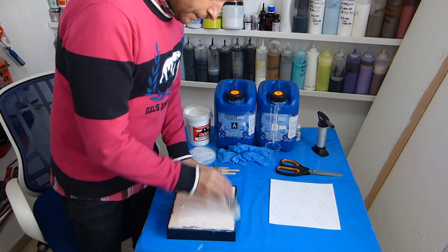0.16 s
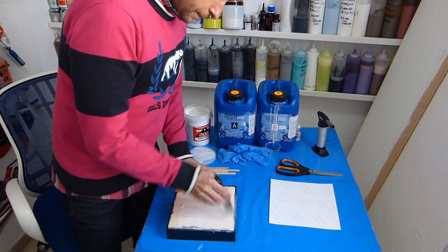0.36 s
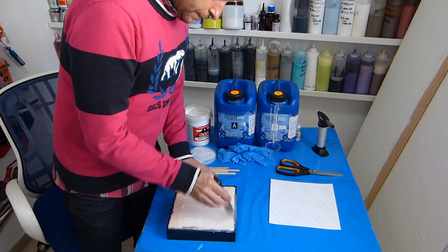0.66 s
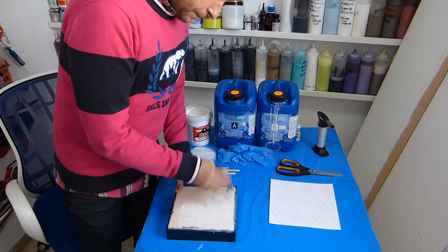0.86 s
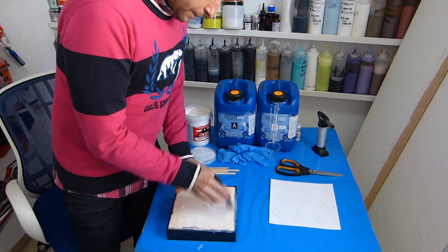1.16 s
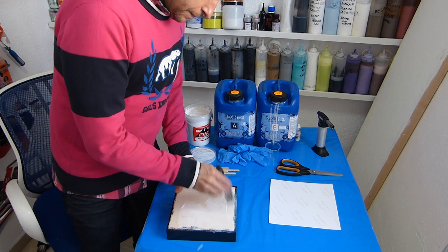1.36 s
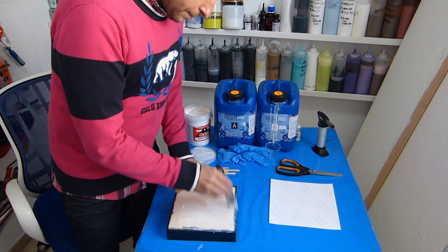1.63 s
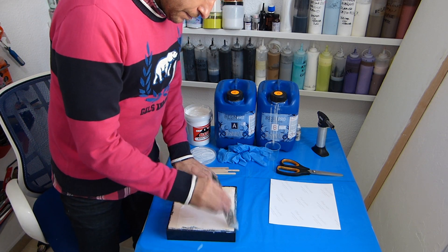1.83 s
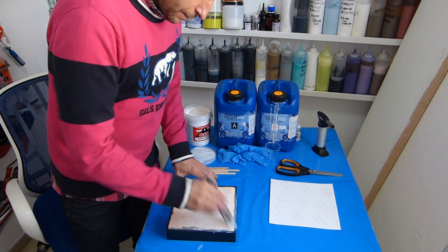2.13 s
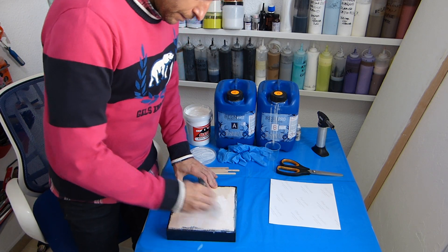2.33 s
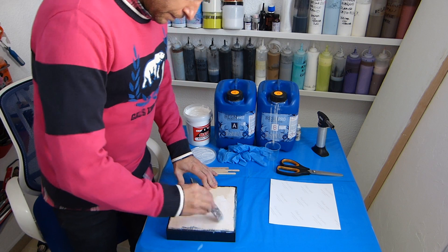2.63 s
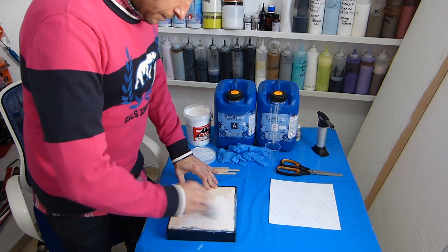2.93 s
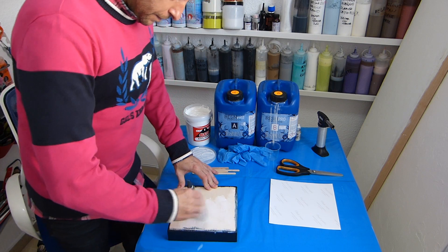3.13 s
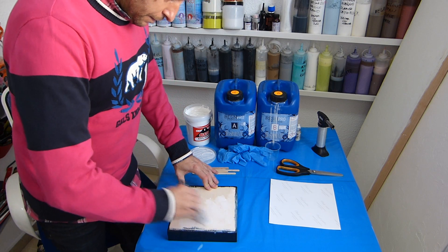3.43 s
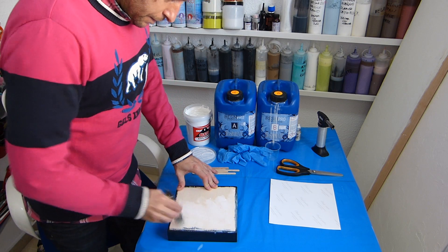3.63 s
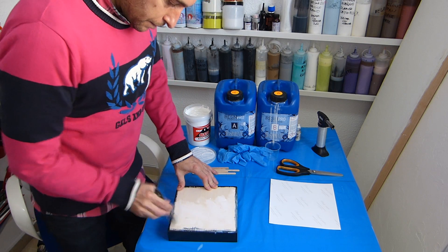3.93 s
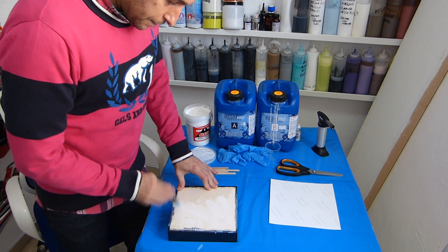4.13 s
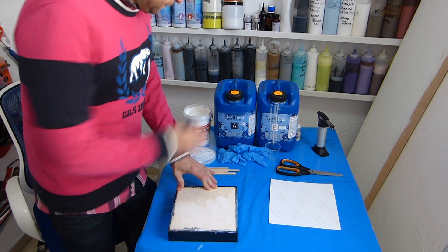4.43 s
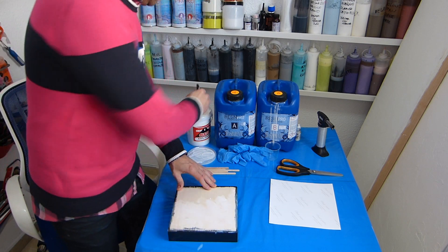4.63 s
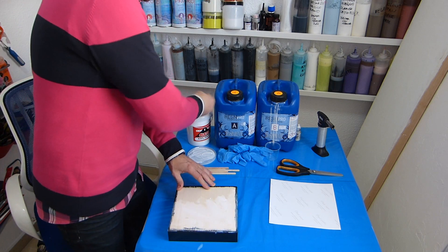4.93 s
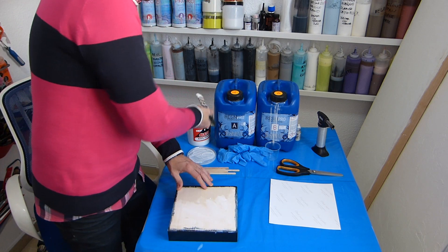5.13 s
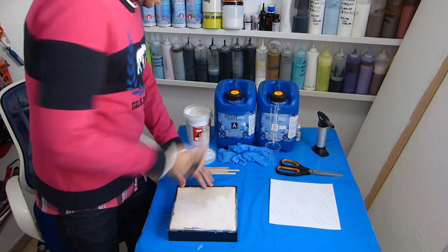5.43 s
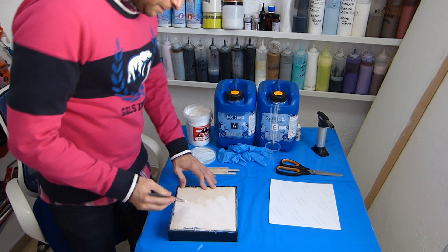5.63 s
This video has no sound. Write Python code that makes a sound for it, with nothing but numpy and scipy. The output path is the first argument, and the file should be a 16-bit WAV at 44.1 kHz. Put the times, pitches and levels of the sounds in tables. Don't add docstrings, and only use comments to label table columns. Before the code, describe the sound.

Close, quiet stereo sound of a flat brush spreading glue on a hollow wooden panel in a small room with a short, dull echo and steady soft hiss. From 0 to 1.2 s, quick airy swishes come every fraction of a second, brightest near 0.27 and 0.55 s, with faint woody handle taps. From 1.2 to 2 s the strokes are weaker, ending in a small dab. Between 2.2 and 2.9 s, dabs cluster with stickier, mid-toned scraping and light knocks. At 3.1 s the panel bumps the table: a rapid, hollow, low woody clatter, quickly damped, leaving a thin ring. Softer rubbing follows until crisp bristle slaps at 3.98 and 4.1 s, with more dabs, ticks and a knock at 4.2-4.3 s. Light sticky touches come around 4.7-4.9 s, then near quiet. At 5.6 s a small clicky tap and brief scrape precede the fading hiss.

```python
import sys
import numpy as np
from scipy import signal
from scipy.fft import rfft, irfft, next_fast_len
from scipy.io import wavfile
from scipy.ndimage import uniform_filter1d

SR = 44100
rng = np.random.default_rng(int(sys.argv[2]) if len(sys.argv) > 2 else 0)


def store_wav(level_fs):
    pcm = np.round(np.clip(np.atleast_2d(level_fs), -1, 1) * 32767)
    wavfile.write(sys.argv[1], SR, pcm.T.astype(np.int16))


def field_ratio(decibels):
    return 10 ** (np.asarray(decibels, dtype=float) / 20)


N = 254348


def rms_one(x):
    return x / np.sqrt(np.mean(x ** 2) + 1e-20)


def at_hz(points, hz):
    table = np.array(points)
    return np.interp(np.log(hz), np.log(table[:, 0]), table[:, 1])


def high_pass(x, hz):
    return signal.sosfilt(signal.butter(4, hz, "high", fs=SR, output="sos"), x)


def drift(rate, spread_db=None):
    r = np.exp(-80 * np.pi * rate / SR)
    slow = signal.lfilter([1], [1, -2 * r, r * r], rng.standard_normal(N // 40 + 2002))[2000:]
    slow = rms_one(slow - slow.mean())
    if spread_db is not None:
        slow = field_ratio(spread_db * np.minimum(slow, 2))
    return np.interp(np.arange(N) / 40, np.arange(len(slow)), slow)


def ring(x, hz, t60):
    r = field_ratio(-60 / (max(t60, 0.005) * SR))
    w = 2 * np.pi * hz / SR
    return signal.lfilter([0, np.sin(w)], [1, -2 * r * np.cos(w), r * r], x + 1e-18)


def resonate(x, peaks):
    out = 0
    for k, (hz, width_hz, db) in enumerate(peaks):
        r = np.exp(-np.pi * width_hz / SR)
        gain = (-1) ** k * field_ratio(db) * (1 - r * r) / 2
        out = out + signal.lfilter([gain, 0, -gain], [1, -2 * r * np.cos(2 * np.pi * hz / SR), r * r], x)
    return out


def slips(per_s, spread_db, size):
    shape = size + (N,)
    when = rng.random(shape) < per_s / SR
    strength = field_ratio(spread_db * np.minimum(rng.exponential(1, shape), 3.3))
    return rms_one(when * strength * rng.choice([-1, 1], shape))


# (frequency [Hz], likeness [-1 to 1])
STEREO_LIKENESS = [(60, 1), (150, 0.17), (380, -0.82), (950, -0.57), (2380, 0.21), (5960, 0.75),
                   (15000, -0.21)]
# (frequency [Hz], left over right [dB])
STEREO_LEAN = [(60, -0.5), (240, 0.5), (950, 0), (3760, 1.5), (15000, 1)]


def coloured(white, spectrum, patchy_db):
    out = 0
    edges = spectrum[0][0] * 2 ** np.arange(0, 9, 1 / 3)
    edges = edges[edges < 16500]
    for k, (low, high) in enumerate(zip(edges, edges[1:])):
        band = signal.butter(2, [low, high], "band", fs=SR, output="sos")
        mid, side = signal.sosfilt(band, white[k % 2])
        hz = np.sqrt(low * high)
        alike = np.clip(at_hz(STEREO_LIKENESS, hz), -1, 1)
        lean_db = at_hz(STEREO_LEAN, hz) / 2
        pair = np.sqrt(1 + alike) * mid + np.sqrt(1 - alike) * side * [[1], [-1]]
        level = field_ratio(at_hz(spectrum, hz) + np.array([[lean_db], [-lean_db]]))
        out = out + drift(6.0, patchy_db) * pair * level
    return rms_one(out)


# (time [s], light contact [dB], stickiness [dB], nearness to the rim [dB/octave])
RESTING_BRUSH = [(0, -58, -5, -3), (.19, -62.5, 1.5, 8), (.5, -61, -8.5, 2), (.79, -61, -3.5, 5),
                 (1.04, -66.5, -15, 5), (1.39, -68, -15, -5), (1.77, -65, -7, -7), (2.2, -66.5, -3.5, -7),
                 (2.42, -60.5, -4.5, 0), (2.71, -65, -1.5, -5.5), (3.02, -61, -6.5, 4),
                 (3.36, -65.5, -4.5, -2.5), (3.94, -61.5, -6.5, -7.5), (4.18, -63.5, -8, -8),
                 (4.4, -55.5, -6.5, 12), (4.95, -57, -8.5, 9), (5.16, -65.5, -9, 6), (5.77, -60, 0, 13)]
# (time [s], peak [dB], scrape relative to it [dB], fade t60 [s])
BRISTLE_DABS = [(0.107, -39.5, -13, 0.23), (0.3893, -47, 1, 0.15), (0.4544, -44, -4.5, 0.2),
                (0.8001, -46, 0, 0.13), (1.075, -46, -3.5, 0.15), (1.81, -45.5, 1, 0.097),
                (1.9758, -38.5, -20, 0.31), (2.2436, -37, -14, 0.11), (2.278, -37.5, -12, 0.43),
                (2.3496, -41.5, -4.5, 0.25), (2.398, -45, 6.5, 0.075), (2.5047, -44, -1, 0.16),
                (2.5592, -36, -23, 0.19), (2.7994, -43, -7, 0.203), (2.8692, -42, -7.5, 0.25),
                (3.0687, -38.5, -1, 0.071), (3.103, -31.5, -5, 0.083), (3.2755, -49, 4.5, 0.11),
                (3.378, -35.5, -29, 0.15), (3.497, -45, -7.5, 0.47), (3.5675, -43.5, -22, 0.16),
                (3.9865, -28, -18, 0.11), (4.0942, -29, -24, 0.11), (4.196, -32.5, -15, 0.31),
                (4.236, -33, -9.5, 0.45), (4.274, -35, -2, 0.25), (4.674, -36, -5.5, 0.121),
                (4.7194, -37.5, -12, 0.135), (4.9097, -47, 3, 0.12), (5.603, -43, -4, 0.13)]
# (fastest at [s], hiss [dB], swell [s], tip sheen relative [dB], glue scrape relative [dB])
STROKES = [(.003, -49.5, 0.024, -7.5, -7), (.08, -54, 0.054, -8, -9), (0.265, -44, 0.074, -4, -18),
           (.4, -53.5, 0.05, -11, -3), (0.541, -47, 0.026, -3.5, -28), (.82, -56.5, 0.061, -25, -6),
           (1.101, -52, 0.051, -5.5, -7), (1.32, -60.5, 0.041, -5.5, -12), (1.6, -62, 0.032, -18, -1),
           (1.81, -57, 0.025, -10, -2.5), (1.981, -54.5, 0.021, -29, 0.5), (2.27, -51.5, 0.053, -23, 0),
           (2.53, -52, 0.085, -18, -0.5), (2.62, -55, 0.044, -9, -6), (2.83, -55.5, 0.2, -7, -2.5),
           (3.131, -44.5, 0.035, -9, -12), (3.389, -52, 0.028, -7, -13), (3.72, -57.5, 0.15, -9.5, -8),
           (3.985, -42, 0.032, -14, -2.5), (4.095, -50, 0.071, -37, -7), (4.205, -46, 0.02, -28, -2),
           (4.7, -51, 0.1, -24, -1.5), (5.51, -58, 0.026, -8, 2.5), (5.62, -64, 0.031, -25, -13)]
# (fastest at [s], hiss [dB], swell [s], glue scrape relative [dB])
LIGHT_STROKES = [(.66, -62.5, .05, -1), (.96, -63.5, 0.055, -1.5), (1.19, -62, .03, -9),
                 (1.43, -63, .03, -7), (1.52, -64, 0.037, -7), (1.92, -68, .04, -9),
                 (3.05, -53.5, 0.026, 0), (3.64, -77, .05, -8), (3.78, -55.5, 0.02, -6),
                 (4.47, -61, 0.037, -1), (4.8, -57.5, 0.08, 5), (5.04, -61.5, 0.071, -13),
                 (5.34, -63.5, 0.092, 3), (5.56, -62.5, 0.028, 4.5)]
# (time [s], level [dB], hold [s], t60 [s], nearness to the rim [dB/octave])
PANEL_SHAKES = [(0, -52, 0.037, 0.15, 1), (0.21, -56.5, 0.04, .2, 16), (1.28, -67, 0.043, 0.18, 11),
                (2.858, -58, 0.043, 0.23, -1), (3.041, -54, 0.049, .1, 0), (3.1, -40.5, 0.049, 0.17, -3.5),
                (3.202, -55, 0.044, 0.17, -7), (3.925, -62, 0.046, 0.22, -6), (4.244, -51.5, 0.05, .15, 3),
                (4.645, -59.5, 0.036, .2, -11), (5.595, -57.5, 0.023, 0.44, 11)]


def pressure():
    t = np.arange(N) / SR
    s, *columns = np.transpose(RESTING_BRUSH)
    rest_db, sticky_db, rim_db = [np.interp(t, s, c) for c in columns]

    lift_s, lift_db, bump_lift_db = 0.061, -2, -5
    bump_s = PANEL_BUMP[0][0]
    ease = np.exp(-np.abs(t - bump_s) / lift_s) * (t < bump_s) * bump_lift_db
    dabs, dab_scrape = np.zeros(N), np.zeros(N)
    for start, db, rel_db, t60 in BRISTLE_DABS:
        i = round(start * SR)
        age = t[:min(N - i, SR // 3)]
        dab = (1 - np.exp(-age / 0.0027)) * field_ratio(2 * (db - 12.0 - 60 * age / max(t60, 0.02)))
        dabs[i:i + len(age)] += dab
        dab_scrape[i:i + len(age)] += dab * field_ratio(2 * rel_db)
        lead = t[:min(i, SR // 10)][::-1]
        ease[i - len(lead):i] += lift_db * np.exp(-lead / lift_s)

    rest, sweeps = field_ratio(2 * rest_db), np.zeros(N)
    sheen = rest * field_ratio(2 * (-9 - 0.28 * rim_db))
    scrape = rest * field_ratio(2 * sticky_db)
    light = [(s, db, swell, -9, rel_db) for s, db, swell, rel_db in LIGHT_STROKES]
    for peak, db, swell, sheen_db, scrape_db in STROKES + light:
        near = slice(max(round(peak * SR) - SR // 3, 0), round(peak * SR) + SR // 2)
        fade = 0.04 + 0.75 * swell
        away = np.where(t[near] < peak, (peak - t[near]) / swell, (t[near] - peak) / fade)
        sweep = field_ratio(2 * (db - 15 * np.minimum(away, 5) ** 1.3))
        sweeps[near] += sweep
        sheen[near] += sweep * field_ratio(2 * sheen_db)
        scrape[near] += sweep * field_ratio(2 * scrape_db)

    eased = field_ratio(2 * ease)
    hum = eased * (rest * field_ratio(2 * (0.5 + sticky_db)) + sweeps * field_ratio(2 * -14.5))
    tilt = hum * (rim_db + 4 * sweeps / (rest + sweeps))
    for start, db, hold, t60, shake_rim_db in PANEL_SHAKES:
        near = slice(round(start * SR), round(start * SR) + SR // 2)
        age = t[near] - start
        shake = np.clip(age / 0.011, 0, 1) * field_ratio(2 * (db - 60 * np.maximum(age - hold, 0) / t60))
        hum[near] += shake
        tilt[near] += shake * shake_rim_db

    hiss = eased * (rest + sweeps) + dabs
    sheen = (eased * sheen + dabs * field_ratio(2 * -29)) / hiss
    scrape = eased * scrape * field_ratio(-9.0) + dab_scrape
    return np.sqrt(hiss), np.sqrt(sheen), np.sqrt(scrape), field_ratio(-5.0) * np.sqrt(hum), tilt / hum


# (frequency [Hz], density [dB per Hz])
BRISTLE_TONE = [(1650, -11.5), (2800, -5), (3090, -2.5), (3960, -0.5), (4370, 0), (6330, 0), (7700, 0),
                (9000, -9), (11700, -32), (19800, -120)]


def tufts(count):
    out = 0
    rub = slips(14000, 2.6, size=())
    for hz in np.geomspace(3200, 11000, count) * rng.uniform(0.9, 1.03, count):
        streak = resonate(rub, [(hz, 70, 0)])
        out = out + field_ratio(at_hz(BRISTLE_TONE, hz)) * drift(7.0, spread_db=5.5) * streak
    return rms_one(out)


# (frequency [Hz], density [dB per Hz])
TIP_SHEEN = [(7500, -7), (9000, 8), (11000, -7), (13000, -7), (14500, -26), (15500, -40)]


def bristles(hiss, sheen):
    ticks = slips(14000, 3.3, size=(2, 2))
    body = coloured(ticks, BRISTLE_TONE, patchy_db=2.0)
    body = rms_one(body + field_ratio(-6.5) * tufts(count=22))
    body = body - np.clip(0.84 * sheen, 0, 0.9) * resonate(body, [(3060, 1900, 0)])
    bright = body + sheen * coloured(ticks, TIP_SHEEN, patchy_db=2.0)
    soft_top = signal.butter(4, 14000, fs=SR, output="sos")
    return hiss * field_ratio(0.15 * drift(40)) * signal.sosfilt(soft_top, bright)


# (frequency [Hz], width [Hz], level [dB])
GLUE_SCRAPE = [(1220, 1010, -0.5), (1880, 280, 7.5), (2310, 830, 0.5)]


def glue(scrape):
    sticky = rms_one(resonate(slips(5000, 3.4, size=()), GLUE_SCRAPE))
    return scrape * field_ratio(0.78 * drift(44.0)) * sticky


# (frequency [Hz], level [dB], t60 [s])
PANEL_MODES = [(138, -16.5, 0.34), (196, -3.5, 0.14), (302, -13, 0.061), (323, -13.5, 0.07),
               (380, -12, 0.063), (455, -12, 0.055), (500, -6.5, 0.065), (610, -14, 0.052),
               (755, -14, 0.014), (822, -5, 0.049), (965, -11, 0.06), (1140, -1, 0.027), (1328, -8.5, 0.27),
               (1400, -18, 0.21), (1560, -11, 0.098), (1933, -13.5, 0.071)]
# (time [s], blow [dB])
PANEL_BUMP = [
    (3.103, -53),
    (3.107, -44.5),
    (3.115, -37),
    (3.118, -37),
    (3.123, -37),
    (3.129, -41),
    (3.1386, -37),
    (3.157, -44),
    (3.184, -46),
]


def panel(hum, tilt_db):
    rub = slips(2500, 2.8, size=())
    at = [round(s * SR) for s, db in PANEL_BUMP]
    blow_db = np.array(PANEL_BUMP)[:, 1]
    humming, struck, power = 0, 0, 0
    for hz, db, t60 in PANEL_MODES:
        share = field_ratio(db + (1.0 + tilt_db) * np.log2(hz / 600))
        rubbed = rms_one(ring(rub, hz, 0.28 * t60))
        humming = humming + share * drift(8, spread_db=2) * rubbed
        power = power + share ** 2
        blows = np.zeros(N)
        blows[at] = field_ratio(blow_db + db + rng.normal(0, 2.9, len(at)))
        struck = struck + ring(blows, hz, t60)
    damping = field_ratio(-6 * np.clip((np.arange(N) / SR - 3.152) / 0.013, 0, 1))
    return field_ratio(-2.0) * hum * humming / np.sqrt(power) + struck * damping


# (frequency [Hz], density [dB per Hz])
ROOM_TONE = [(35, -9), (60, -8), (265, -1.5), (376, 2), (641, 1.5), (771, -1), (1090, -2.5), (1230, -3.5),
             (1350, -3), (1950, -9.5), (3410, -16), (4720, -7.5), (15400, -27)]


def room_hiss():
    return field_ratio(-60 - 2.0) * coloured(rng.standard_normal((2, 2, N)), ROOM_TONE, patchy_db=3.0)


def room(x):
    t60_s, wall_cut_hz = 0.23, 5400
    size = next_fast_len(N + SR)
    w = 2 * np.pi * np.arange(size // 2 + 1) / size
    wall = 1 / (1 + 1j * w * SR / (2 * np.pi * wall_cut_hz))
    out = [0, 0]
    for k, lag in enumerate((rng.uniform(0.009, 0.03, 16) * SR).astype(int)):
        loop = field_ratio(-60 * lag / SR / t60_s) * wall * np.exp(-1j * w * lag)
        out[k % 2] = out[k % 2] + (-1) ** (k // 2) * loop / (1 - loop)
    return irfft(rfft(x, size) * np.array(out), size)[:, :N]


# (time [s], peak [dB], ring [Hz], crack relative [dB])
HANDLE_KNOCKS = [(0.03, -50, 790, -19), (0.089, -55, 1005, -15), (0.118, -51.5, 318, -10),
                 (0.149, -55, 310, -18.5), (0.236, -45, 822, -17), (0.269, -53, 815, -21),
                 (0.289, -54, 844, -14), (0.329, -61, 850, -10), (1.163, -59, 990, -17),
                 (2.275, -54, 397, -3), (2.349, -54, 404, -8), (2.434, -57, 976, -12),
                 (2.519, -54.5, 1044, -15), (2.569, -62, 427, -8), (2.799, -59, 332, -7),
                 (2.876, -45.5, 421, -12.5), (2.908, -66, 450, -14), (3.067, -50.5, 191, -8),
                 (3.765, -47, 409, -23), (4.246, -39.5, 389, -18), (4.284, -53, 403, -7),
                 (4.298, -53, 836, -14), (4.314, -58, 844, -9), (4.452, -55, 1400, -18),
                 (5.499, -56, 1200, -9), (5.604, -53.5, 750, -0.5), (5.609, -51, 1057, -1.5),
                 (5.653, -52.5, 1060, -11), (5.682, -54, 700, -12), (5.692, -53.5, 867, -18)]


def knocks():
    out, age = np.zeros(N + SR), np.arange(SR // 4) / SR
    detune = rng.uniform(1.031, 1.26, (len(HANDLE_KNOCKS), 2))
    cracks = rng.standard_normal((len(HANDLE_KNOCKS), len(age)))
    cracks = signal.sosfilt(signal.butter(2, [600, 4000], "band", fs=SR, output="sos"), cracks)
    for (start, db, hz, crack_db), (up, down), crack in zip(HANDLE_KNOCKS, detune, cracks):
        phase = 2 * np.pi * hz * age
        modes = np.sin(phase) + 0.26 * np.sin(phase * up) + 0.51 * np.sin(phase / down)
        body = (1 - np.exp(-age * hz / 1.7)) * modes
        body = body + field_ratio(crack_db + 10.5) * crack * np.exp(-age / 0.0097)
        body = field_ratio(db - 7.0 - 60 * age / 0.056 * (hz / 500) ** 0.22) * body
        for delay, echo_db in [(0, 10), (0.018, -2), (0.037, -15)]:
            i = round((start + delay) * SR)
            out[i:i + len(age)] += field_ratio(echo_db) * body
    return out[:N]


# (time [s], held [s], frequency [Hz], width [Hz], level [dB])
RUBBED_SPOTS = [(.03, 0.035, 1380, 120, -69), (.07, .02, 800, 90, -71), (.095, 0.043, 1020, 119, -65),
                (.11, 0.027, 690, 100, -63.5), (0.241, 0.033, 1700, 120, -62), (.25, 0.084, 835, 160, -67),
                (.26, 0.026, 2070, 150, -66), (.29, 0.044, 1290, 100, -70), (.39, 0.045, 1090, 150, -76),
                (2.26, 0.039, 430, 70, -63), (2.32, .04, 1380, 150, -68), (2.34, 0.069, 417, 60.4, -68),
                (2.35, 0.041, 570, 79, -65.5), (2.43, .02, 1010, 120, -65.5), (2.5, 0.082, 420, 50.3, -66),
                (2.505, 0.033, 5960, 700, -56.5), (2.511, 0.048, 1660, 100, -67),
                (2.516, 0.03, 1050, 120, -65), (2.56, .02, 7000, 700, -61), (2.61, 0.036, 1290, 100, -70),
                (2.615, .03, 4900, 300, -62), (2.621, 0.034, 2560, 200, -64.5),
                (2.775, .05, 3230, 100, -72), (2.781, 0.029, 400, 150, -64),
                (2.81, 0.017, 6200, 500, -58.5), (2.89, 0.073, 435, 50, -68), (2.9, 0.017, 2260, 120, -68),
                (3.114, 0.027, 812, 90, -43.5), (4.13, 0.029, 1944, 100, -66),
                (4.2, .007, 6600, 1300, -48), (4.235, 0.037, 2310, 150, -59.5),
                (4.28, .025, 750, 120, -57), (4.285, 0.019, 1060, 90, -61), (4.29, 0.057, 194, 40, -66),
                (4.3, 0.026, 422, 50, -66), (5.605, .028, 6800, 700, -61),
                (5.607, 0.0064, 1070, 200, -52.5), (5.613, 0.017, 4000, 400, -59.5),
                (5.626, .01, 1200, 250, -65), (5.66, .015, 4000, 300, -66),
                (.06, 0.085, 3300, 500, -67), (.07, 0.073, 6500, 1500, -65),
                (.225, 0.065, 6800, 2010, -50.5), (.235, 0.054, 11500, 2500, -54),
                (.39, 0.026, 6960, 1500, -60), (.53, 0.036, 7200, 1800, -52), (.785, 0.026, 2100, 800, -63),
                (.802, 0.024, 3870, 600, -61), (1.07, 0.063, 6300, 1600, -56.5),
                (1.07, .04, 1940, 500, -66), (1.17, .04, 6260, 1500, -66), (1.575, 0.048, 1870, 900, -68.5),
                (1.59, .06, 6030, 1600, -65), (1.81, 0.018, 1980, 500, -72),
                (1.812, 0.026, 5800, 1500, -59), (1.968, 0.019, 2070, 700, -61.5),
                (1.975, 0.024, 6200, 1500, -60), (2.24, 0.016, 2250, 500, -62), (3.105, .015, 191, 40, -44),
                (3.108, 0.038, 2280, 600, -64), (3.112, 0.037, 323, 40, -42.5),
                (3.118, 0.024, 468, 60, -50), (3.96, 0.05, 6200, 1500, -53.5),
                (4.55, 0.078, 4930, 300, -62.5), (3.14, 0.027, 1155, 40, -57),
                (4.675, 0.055, 4060, 150, -63), (4.678, .015, 2980, 250, -61), (4.71, .02, 1990, 100, -62),
                (4.755, .045, 3950, 200, -63.5), (4.76, 0.019, 2010, 100, -62), (4.76, .06, 3330, 200, -68),
                (4.91, 0.013, 1900, 300, -65), (.42, .05, 1900, 900, -67), (4.45, 0.1, 3150, 900, -75),
                (4.83, 0.11, 3200, 900, -78)]


def rubs():
    out, age = np.zeros((2, N + SR)), np.arange(SR // 6) / SR
    spots = RUBBED_SPOTS
    noise = rng.standard_normal((len(spots), 2, SR // 5))
    for (start, held, hz, width_hz, db), pair in zip(spots, noise):
        even = np.sign(resonate(pair, [(hz, width_hz, 0)]))
        mid, side = rms_one(resonate(even, [(hz, 2 * width_hz, 0)])[:, -len(age):])
        shape = field_ratio(db) * np.clip(age / 0.0013, 0, 1) * np.exp(-np.maximum(age - held, 0) / 0.0058)
        i = round(start * SR)
        out[:, i:i + len(age)] += shape * (mid + field_ratio(-8) * side * [[1], [-1]])
    return signal.sosfilt(signal.butter(4, [140.0, 12000.0], "band", fs=SR, output="sos"), out[:, :N])


# (time [s], peak [dB], frequency [Hz], t60 [s])
THIN_RINGS = [(.033, -47, 810, 0.13), (.05, -54, 1028, 0.14), (.09, -55, 320, 0.21), (.244, -56, 844, 0.16),
              (.26, -55.5, 444, 0.11), (.3, -55, 815, .2), (.392, -49, 1840, 0.018),
              (.455, -53, 2100, .015), (.8, -54, 2200, .04), (0.806, -51, 3960, 0.081),
              (1.978, -50.5, 2090, 0.045), (3.042, -60, 1290, .09), (3.175, -51, 520, 0.14),
              (3.17, -52.5, 274, 0.15), (3.18, -61, 200, 0.18), (3.172, -52, 1323, 0.41),
              (3.222, -61, 1325, .2), (3.16, -54, 1000, 0.16), (3.265, -64, 274, 0.16),
              (3.275, -56.5, 1320, .13), (3.295, -69, 430, .3), (4.0944, -49, 2450, .012),
              (4.094, -42, 1910, 0.036), (4.1018, -39, 1950, 0.02), (4.11, -44, 1840, .025),
              (4.117, -46, 2050, .025), (4.122, -60, 1905, 0.46), (4.124, -61, 1990, .45),
              (4.197, -43, 2070, 0.023), (4.206, -51, 1900, .015), (4.238, -49, 1870, .05),
              (4.24, -48, 4090, .11), (4.273, -45.5, 4070, 0.076), (5.6028, -42.5, 1390, 0.01),
              (5.6036, -52, 1940, .015), (5.6036, -47, 726, 0.035), (5.613, -52, 840, 0.054),
              (5.627, -63, 1250, .04), (5.76, -56, 1500, .04), (5.604, -54, 5500, .012),
              (5.6068, -51, 1310, .008), (5.653, -48, 1590, .01), (5.652, -57, 1840, .05),
              (5.68, -54, 1820, 0.11), (5.72, -60, 1794, 0.14)]


def rings():
    out, age = np.zeros(N + SR), np.arange(SR // 2) / SR
    for start, db, hz, t60 in THIN_RINGS:
        i = round(start * SR)
        out[i:i + len(age)] += field_ratio(db - 60 * age / t60) * np.sin(2 * np.pi * hz * age)
    return out[:N] * (1 + 0.25 * drift(60))


# (frequency [Hz], width [Hz], level of the resonance taken away [dB])
TABLE_NOTCHES = [(2864, 120, -4.5), (4440, 170, -7.5)]


def scene():
    hiss, sheen, scrape, hum, tilt_db = pressure()
    bright = bristles(hiss, sheen)
    wood = high_pass(glue(scrape) + panel(hum, tilt_db) + knocks() + rings(), 153.0)
    echo = room(field_ratio(-12) * high_pass(wood, 310) + field_ratio(-29) * bright[0])
    near = bright + wood * field_ratio([[-1.5], [-1.4]]) + echo + rubs()
    for dip in TABLE_NOTCHES:
        near = near - resonate(near, [dip])
    return near + room_hiss()


def top_cut(x):
    return signal.sosfilt(signal.butter(12, 15560.0, fs=SR, output="sos"), x)


def record(dry):
    low = signal.sosfiltfilt(signal.butter(8, 14040, fs=SR, output="sos"), dry)
    top = dry - low
    loud_db = 10 * np.log10(uniform_filter1d(np.mean(dry ** 2, axis=0), size=1500) + 1e-12)
    dry = dry - top * np.interp(loud_db, [-58, -55.5], [0, 0.92])
    offset = -0.0026 + field_ratio(-75.5) * drift(7.0) + field_ratio(-99) * drift(11.0) * [[1], [-1]]
    return top_cut(dry + offset)


dry = scene()
out = record(dry)
store_wav(out)
```